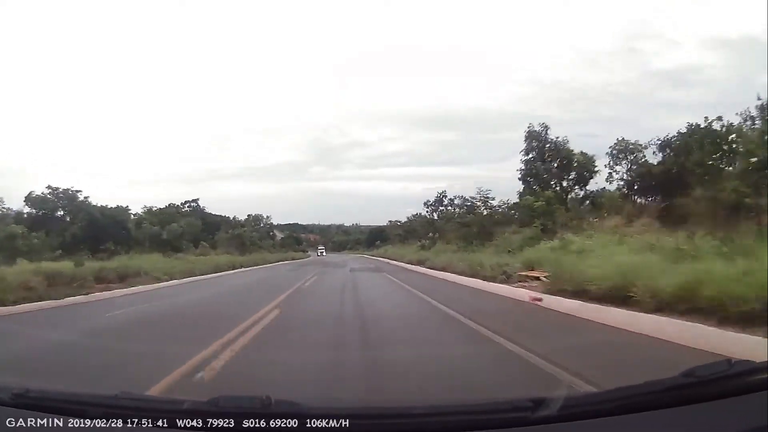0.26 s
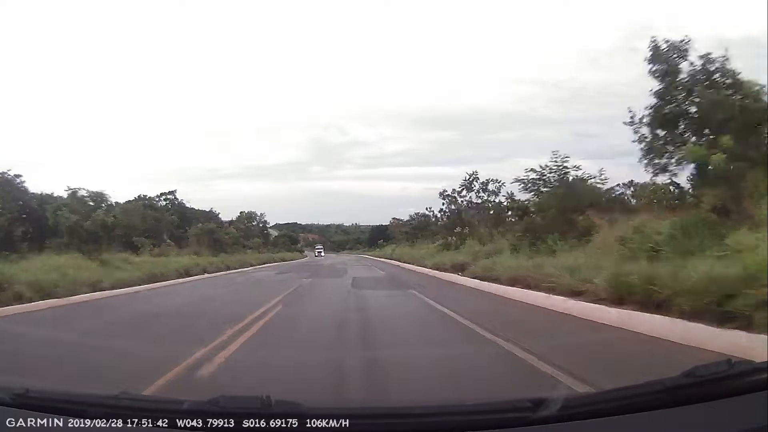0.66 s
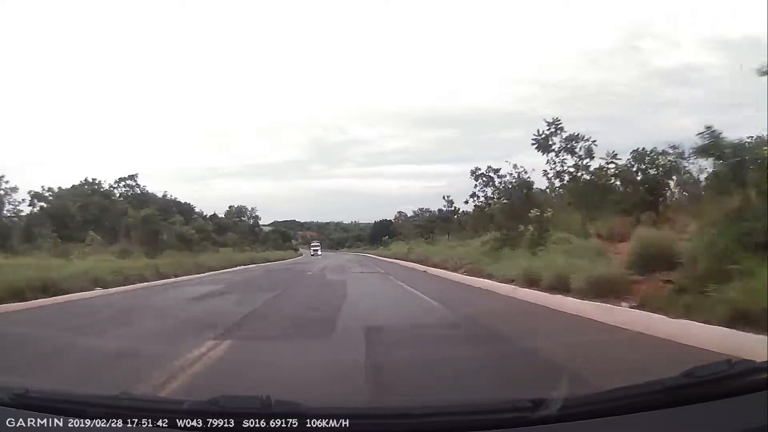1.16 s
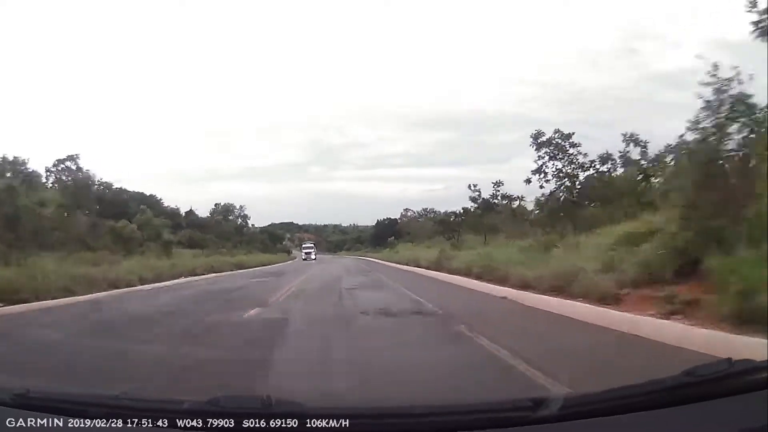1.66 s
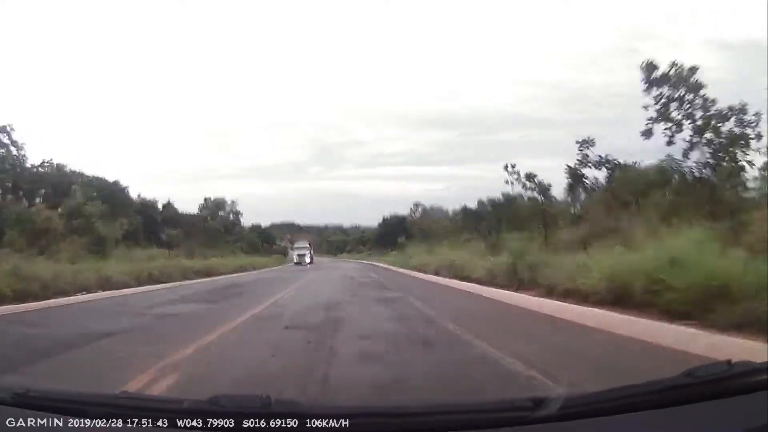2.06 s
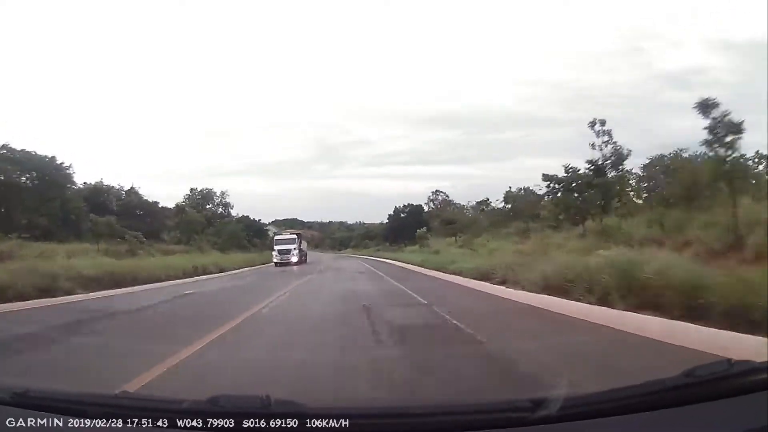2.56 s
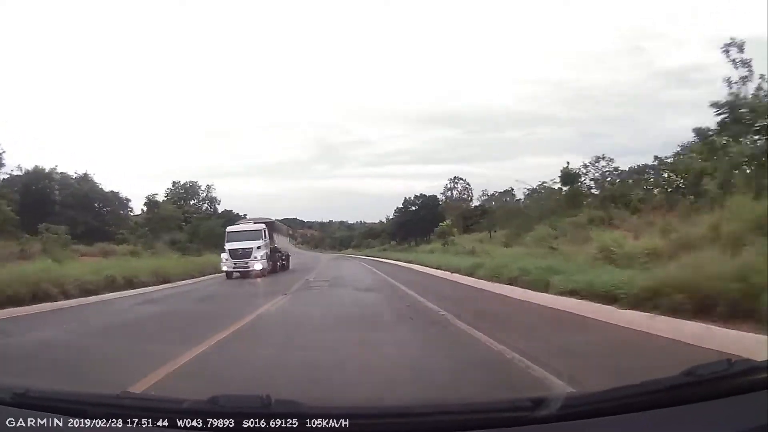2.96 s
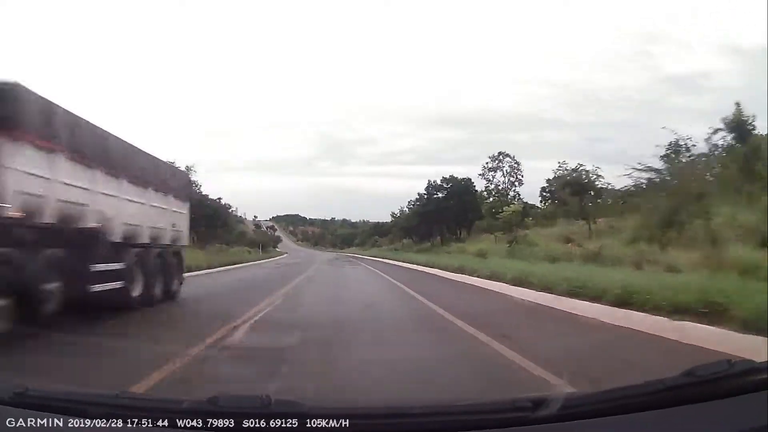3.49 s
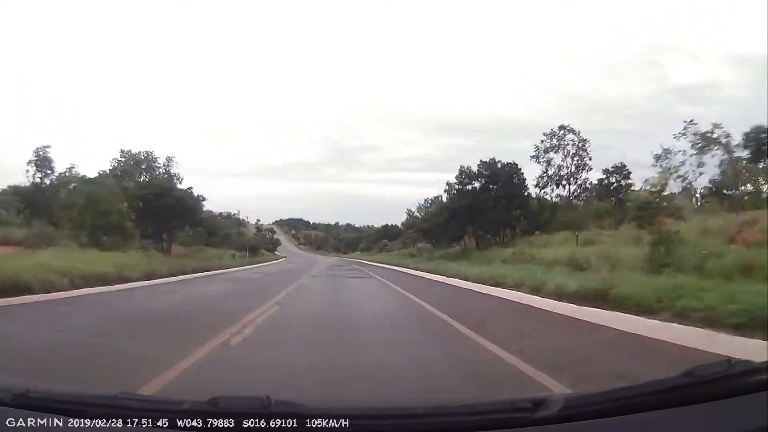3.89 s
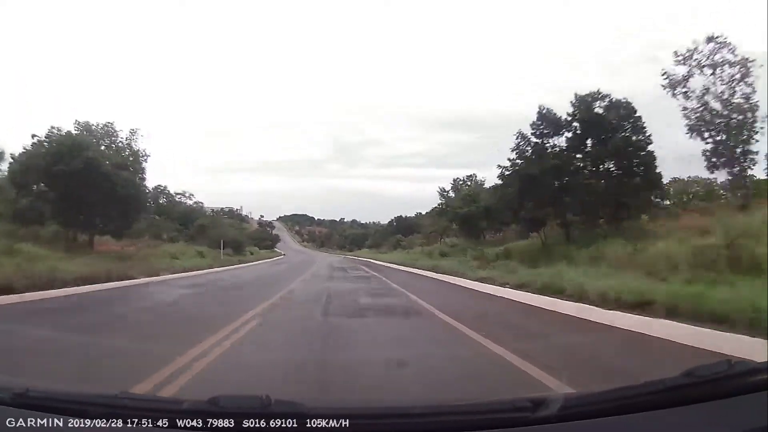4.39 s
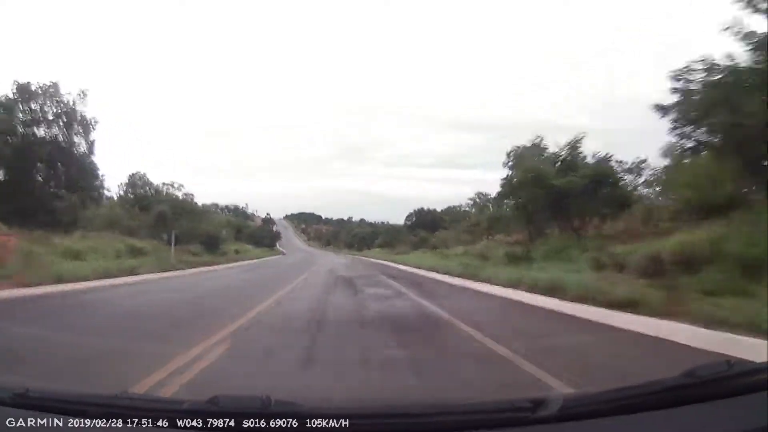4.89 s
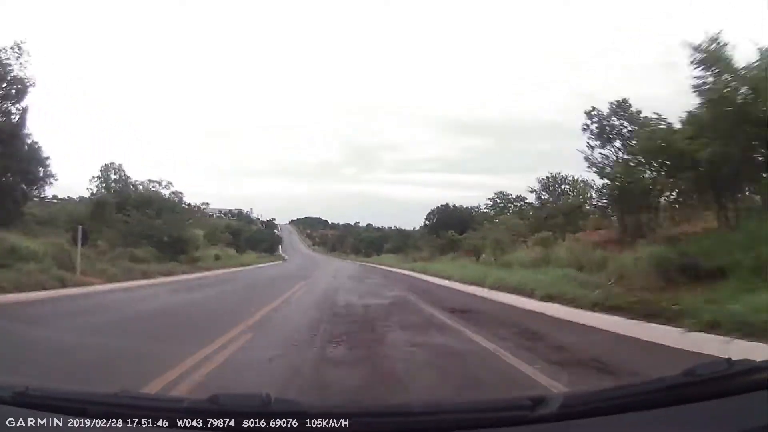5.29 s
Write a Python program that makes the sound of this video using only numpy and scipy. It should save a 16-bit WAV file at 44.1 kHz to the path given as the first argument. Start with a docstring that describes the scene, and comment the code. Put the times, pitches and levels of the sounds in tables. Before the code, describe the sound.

Heavy low rumble of tyres and engine in a car cabin, with bumps, chattering trim, steady faint wind and one brief passing-lorry rush.

```python
"""Inside a car at highway speed, with a small microphone on the windscreen.
Tyre roar and boom, shaped noise that follows a table of the road, lie over engine tones and steady wind.
Patched asphalt shakes the body, sets a loose plastic fitting chattering and overloads the microphone.
An oncoming lorry sweeps past as a swell of noise; trim creaks, and twice a small loose object slides
with a thin, ringing hiss. Plastic, trim and object are damped modes rung by random contacts or rubbing."""
import sys
import numpy as np
from scipy import signal
from scipy.fft import rfft, irfft, next_fast_len
from scipy.io import wavfile
from scipy.ndimage import uniform_filter1d

SR = 44100
rng = np.random.default_rng(int(sys.argv[2]) if len(sys.argv) > 2 else 0)


def transcribe(u):
    """Save the signal u as a 16-bit wav file named by the first command-line argument.

    u: samples, shape (n,) or (channels, n), limited to [-1, 1]; the rate is SR.
    q: integer samples, one column per channel.
    """
    v = np.clip(np.atleast_2d(u).T, -1, 1)
    q = np.round(v * 32767).astype(np.int16)
    wavfile.write(sys.argv[1], SR, q)


N = 244314
TIME = np.arange(N) / SR  # seconds


def amp(db):
    """Decibels to gain."""
    return 10 ** (np.asarray(db) / 20)


def unit(x):
    """Scales to an rms of one."""
    return x / np.sqrt(np.mean(x ** 2) + 1e-20)


def curve(table, column):
    """One column of a table of times, interpolated for every sample."""
    rows = np.asarray(table)
    return np.interp(TIME, rows[:, 0], rows[:, column])


def noise(spectrum, resonances=()):
    """Noise of rms one with the given spectrum, lifted at each resonance."""
    hz, db = np.transpose(spectrum)
    size = next_fast_len(N)
    bins = np.fft.rfftfreq(size, 1 / SR)
    spectrum_db = np.interp(np.log(bins + 1), np.log(hz + 1), db)
    beyond_db = -40 * np.log10(np.maximum(bins / hz[-1], 1))  # 12 dB an octave above the last row
    lift_db = sum(lift / (1 + (2 * (bins - centre) / width) ** 2) for centre, width, lift in resonances)
    shape = amp(spectrum_db + beyond_db + lift_db)
    white = rng.standard_normal(size)
    return unit(irfft(rfft(white) * shape, size)[:N])


def wander(rate_hz):
    """Slow random drift of rms one, with little above the given rate."""
    bins = np.fft.rfftfreq(N, 1 / SR)
    slow = np.exp(-(bins / rate_hz) ** 2) * (bins > 0)
    return unit(irfft(rfft(rng.standard_normal(N)) * slow, N))


def sustained(x, span_s):
    """Evens out the slow swells of a noise, so that its strength is set by what drives it."""
    power = uniform_filter1d(x ** 2, max(int(span_s * SR), 2))
    return x / np.sqrt(power + 1e-6)


def jolt(s, decay_s):
    """A quick rise at time s that dies away."""
    age = np.clip((TIME - s) / decay_s, 0, 20)
    return np.minimum(8 * age, 1) * np.exp(-np.maximum(age - 1 / 8, 0))


def swells(rows):
    """One smooth hump of strength for each row of time, level and length."""
    return sum(amp(db) * np.exp(-(2 * (TIME - s) / length_s) ** 2) for s, db, length_s in rows)


def ring(force, modes):
    """A force rings damped modes of alternating sign; each level weights that mode's energy."""
    t = np.arange(4096) / SR
    response = 0
    for k, (hz, width, db) in enumerate(modes):
        decay = np.exp(-np.pi * width * t)
        strength = (-1) ** k * amp(db) * np.sqrt(width)
        response = response + strength * decay * np.sin(2 * np.pi * hz * t)
    return signal.oaconvolve(force, response / np.linalg.norm(response))[:N]


# The surface passing under the wheels. Each row: time in seconds, unevenness in dB, coarseness in dB.
ROAD_SURFACE = [(0.0, -13, -32.5), (0.14, -7.0, -35.5), (0.32, -18, -32), (1.18, -21, -35),
                (1.35, -11.5, -32.5), (1.62, -6.5, -30), (1.77, -10, -33.5), (2.2, -5, -25.5),
                (2.52, -8.5, -27.5), (2.76, -7.5, -29.5), (3.08, -12, -29.0), (3.3, -12, -34.5),
                (3.53, -10.5, -31.5), (3.76, -8, -25), (3.99, -4, -31), (4.08, -19.5, -34.5),
                (4.6, -19.5, -32.5), (4.82, -8, -29), (5.3, -5, -24.5), (5.54, -12, -30.5)]
BOOM_FROM_COARSE = 0.7  # share of the boom gain (in dB) that follows coarseness; the rest, unevenness


def shaking():
    """How hard the road shakes the body and the cabin air: (shudder gain, boom gain)."""
    uneven, coarse = curve(ROAD_SURFACE, column=1), curve(ROAD_SURFACE, column=2)
    return amp(uneven), amp(uneven + BOOM_FROM_COARSE * (coarse - uneven))


# Colours of body shudder, cabin boom, tyre roar and the thud of a tyre hitting a joint.
# Each row: frequency in Hz, relative density in dB per Hz.
SHUDDER_COLOUR = [(5, -16), (11, -1.5), (17, -3.5), (32, 3), (42, -10), (52, -3.5), (63, -4), (75, -5),
                  (90, -20), (140, -51)]
BOOM_COLOUR = [(45, -20.5), (68, -7), (80, -1), (96, -1.5), (108, -4.5), (124, -0.5), (137, -6), (155, -8),
               (180, -13), (205, -14.5), (222, -20.5), (275, -22.5), (330, -31.5), (500, -39)]
TREAD_COLOUR = [(170, -62), (250, -3.5), (300, 0), (330, -4), (385, -2.5), (420, -8.5), (480, -13.5),
                (560, -13), (730, -19), (1000, -22.5), (1430, -30.5), (1650, -28.5), (3000, -45.5),
                (7000, -41.5)]
THUD_COLOUR = [(80, -24), (190, 8.5), (280, 8), (380, 4.5), (480, -10), (680, -11.5), (1000, -16),
               (1600, -33), (3000, -35)]
# Resonances of suspension, body, cabin air and tyre cavity. Each row: frequency in Hz, width in Hz, lift in dB.
CABIN_RESONANCES = [(15.2, 4.5, 1.5), (23.8, 6.9, 6.5), (196, 9.9, 1.5), (355, 26, 5.5), (604, 100, 3.5),
                    (799, 27, 6.5), (910, 48, 6), (1028, 40, 4), (1246, 28, 7), (3790, 280, 6.5)]
# Joints in the asphalt. Each row: time in seconds, thud in dB, boom in dB, decay in seconds.
ROAD_JOINTS = [(0.015, -30.5, -23, 0.067), (1.531, -36, -16, 0.049), (2.079, -23.5, -14, 0.044),
               (2.334, -25, -14, 0.043), (3.115, -41, -10.5, 0.082), (3.602, -24, -13.5, 0.038),
               (5.268, -24, -12, 0.05)]


def road(shudder_db=-2.5, boom_db=4.0, tread_db=-4.0, lumps_db=1.1, grit_db=0.9):
    """The surface shakes the body, booms in the cabin and roars in the tyres; joints add short thumps."""
    sway, drumming = shaking()
    kicks = sum(amp(db) * jolt(s, decay_s) for s, _, db, decay_s in ROAD_JOINTS)
    shudder = sustained(noise(SHUDDER_COLOUR, CABIN_RESONANCES), 0.1305) * sway * amp(shudder_db)

    boom_gain = np.hypot(drumming * amp(boom_db + lumps_db * wander(6.6)), kicks)
    boom = sustained(noise(BOOM_COLOUR, CABIN_RESONANCES), 0.0777) * boom_gain

    tread_gain = amp(curve(ROAD_SURFACE, column=2) + tread_db + grit_db * wander(25))
    tread = noise(TREAD_COLOUR, CABIN_RESONANCES) * tread_gain

    thud_gain = sum(amp(db) * jolt(s, decay_s) for s, db, _, decay_s in ROAD_JOINTS)
    thumps = noise(THUD_COLOUR, CABIN_RESONANCES) * thud_gain
    return shudder + boom + tread + thumps


# Body panels, the first driven by the shudder, the second by the boom.
# Each row: frequency in Hz, level over that drive in dB, drive that wakes it in dB.
DRONING_PANELS = [(61.94, -11.5, -14), (116.2, 3, -25)]


def drones(waver=0.0066, throb_db=0.5):
    """Lightly damped panels hold a nearly steady note once the road shakes them hard."""
    notes = 0
    for (hz, db, wake_db), drive in zip(DRONING_PANELS, shaking()):
        awake = drive ** 2 / (drive ** 2 + amp(wake_db) ** 2)
        turns = np.cumsum(hz * (1 + waver * wander(5.5))) / SR + rng.random()
        tone = np.sqrt(2) * np.sin(2 * np.pi * turns)
        notes = notes + drive * awake * amp(db + throb_db * wander(5.3)) * tone
    return notes


# The engine's tones. Each row: multiple of the crankshaft speed, rms level in dB.
ENGINE_TONES = [(1, -30.5), (2, -21.5), (4, -44.5), (6, -52)]
CRANK_HZ = 50.13  # crankshaft turns a second


def engine(waver=0.0038, throb_db=1.5):
    """A four-cylinder engine at nearly steady speed: two firings a turn give the drone."""
    turns = np.cumsum(CRANK_HZ * (1 + waver * wander(3.33))) / SR
    total = 0
    for order, db in ENGINE_TONES:
        tone = np.sqrt(2) * np.sin(2 * np.pi * (order * turns + rng.random()))
        total = total + amp(db + throb_db * wander(3.3)) * tone
    return total


# Bouts of free rattling. Each row: start in seconds, length in seconds, level of a contact in dB.
RATTLE_BOUTS = [(2.122, 0.44, -46), (3.669, .17, -47.5), (5.061, 0.42, -44.5)]
# Knocks that stand out from the chatter. Each row: time in seconds, relative peak in dB.
FITTING_KNOCKS = [(0.1156, -35), (1.651, -33), (2.168, -30), (2.2936, -29), (2.4415, -40), (2.5216, -33),
                  (2.7012, -37), (2.992, -31), (3.166, -32.5), (3.7146, -32), (3.8102, -31), (5.0784, -33),
                  (5.1743, -38), (5.3664, -28)]
# Modes of the plastic. Each row: frequency in Hz, width in Hz, relative level in dB.
PLASTIC_MODES = [(6920, 480, -14.5), (8670, 450, -9), (9740, 370, -6.5), (10620, 260, -3.5),
                 (11150, 320, -2), (11500, 510, 2.5), (11630, 300, -2.5), (11700, 320, -10.5),
                 (13900, 2500, -8)]
BUZZ_FROM_DB, BUZZ_RANGE_DB = -28.5, 2  # coarseness that starts the buzz, and the softness of its onset
RATTLE_EDGE_S = 0.034  # fade at each end of a bout


def fitting(knock_db=-9, buzz_db=-53, rattles_hz=160, spread_db=2.2, rattle_s=0.0016, dry_db=-13,
            clump_db=1.5, clump_hz=100, bounce_s=0.0029, contacts_hz=5000):
    """Coarse asphalt makes loose plastic buzz; in bouts it rattles, and knocks are quick runs of bounces."""
    loose = 1 / (1 + np.exp((BUZZ_FROM_DB - curve(ROAD_SURFACE, column=2)) / BUZZ_RANGE_DB))
    clumps = unit(amp(clump_db * np.clip(wander(clump_hz), -2, 2)))
    buzz = amp(buzz_db) * loose * clumps

    bouts = 0
    for start, length, db in RATTLE_BOUTS:
        inside_s = np.minimum(TIME - start, start + length - TIME)
        bouts = bouts + amp(db) * np.clip(inside_s / RATTLE_EDGE_S + 0.5, 0, 1)
    happens = rng.random(N) < rattles_hz / SR
    hits = happens * bouts * amp(spread_db * np.clip(rng.standard_normal(N), -2, 2))
    rattles = signal.oaconvolve(hits, jolt(0, rattle_s)[:4096])[:N]

    knocks = sum(amp(db + knock_db) * jolt(s, bounce_s) for s, db in FITTING_KNOCKS)
    strength = np.sqrt(buzz ** 2 + rattles ** 2 + knocks ** 2)
    # some contacts ring the plastic, others only tick
    ringing, dead = rng.standard_normal((2, N)) * (rng.random((2, N)) < contacts_hz / SR)
    ticks = unit(np.diff(dead, prepend=0))
    return ring(strength * unit(ringing), PLASTIC_MODES) + amp(dry_db) * strength * ticks


# Air pushed aside by the lorry. Each row: frequency in Hz, relative density in dB per Hz.
WAKE_COLOUR = [(150, -13), (420, 5), (700, -16), (1200, -13), (2000, -21), (3600, -25.5), (6000, -34),
               (12000, -27)]


def lorry(pass_s=3.74, span_s=0.2, level_db=-39, buffet_db=1.5):
    """An oncoming lorry sweeps by; its wake rushes briefly along the doors."""
    swell = np.exp(-0.5 * ((TIME - pass_s) / span_s) ** 2)
    return noise(WAKE_COLOUR) * swell * amp(level_db + buffet_db * wander(25))


# Brief bright swishes. Each row: time in seconds, level in dB, length in seconds.
SWISHES = [(1.19, -44.5, 0.084), (3.03, -43.5, 0.077), (3.11, -36, 0.027), (3.36, -42.5, 0.083),
           (4.93, -40, .05), (5.18, -40, 0.08), (5.29, -34.5, 0.036)]
# Their colour. Each row: frequency in Hz, relative density in dB per Hz.
SWISH_COLOUR = [(350, -12), (600, 2), (950, 6), (1300, -7), (2200, -19), (4000, -30)]


def swishes():
    """Bright hissing swishes rise for a moment and fade."""
    return noise(SWISH_COLOUR, CABIN_RESONANCES) * swells(SWISHES)


# Slides of the small object. Each row: start in seconds, length in seconds, rubbing level in dB.
OBJECT_SLIDES = [(2.8, .14, -48), (4.545, 0.15, -53)]
# Modes of the object. Each row: frequency in Hz, width in Hz, relative level in dB.
OBJECT_MODES = [(5520, 340, -4.5), (6280, 350, -2.5), (7040, 200, -4), (7340, 50, -3), (7440, 34, -1),
                (7840, 300, -3), (8800, 200, -2.5)]
SLIDE_RISE_S, SLIDE_STOP_S = 0.093, 0.028  # time to gather speed, and decay on stopping


def slide(slip_db=2.5, slip_hz=50, dry_db=-13, creep_db=-11, creep_s=0.2):
    """The object gathers speed, stops and creeps on a little; uneven slips rub it into its high modes."""
    speed = 0
    for start, length, db in OBJECT_SLIDES:
        after = np.maximum(TIME - start - length, 0)
        creep = amp(creep_db) * np.exp(-after / creep_s)
        stopping = np.maximum(np.exp(-after / SLIDE_STOP_S), creep)
        speed = speed + amp(db) * np.clip((TIME - start) / SLIDE_RISE_S, 0, 1) * stopping
    force = rng.standard_normal(N) * speed * amp(slip_db * wander(slip_hz))
    return ring(force, OBJECT_MODES) + amp(dry_db) * force


# Creaks of the dashboard trim as the body twists. Each row: time in seconds, level in dB, length in seconds.
TRIM_CREAKS = [(1.658, -46.5, .035), (2.16, -50, .03), (3.718, -47.5, .015), (4.83, -55, .02),
               (5.08, -48, .02), (5.37, -50, .025)]
# Modes of the trim. Each row: frequency in Hz, width in Hz, relative level in dB.
TRIM_MODES = [(2850, 350, 3), (3700, 500, -5.5), (4650, 700, -1), (6600, 900, -3), (12500, 3000, 2)]


def creaks(slips_hz=2500):
    """A short run of dense slips rings the trim."""
    slips = unit(rng.standard_normal(N) * (rng.random(N) < slips_hz / SR))
    return ring(swells(TRIM_CREAKS) * slips, TRIM_MODES)


# Air over the windscreen. Each row: frequency in Hz, relative density in dB per Hz.
WIND_COLOUR = [(100, -6), (500, -5), (1000, 8), (1400, -1.5), (1700, 0), (2300, -3), (3200, -8),
               (4800, -14.5), (8000, -18), (11000, -14.5), (16000, -19.5)]


def wind(level_db=-47.5, flutter_db=1.0):
    """Air rushes over the windscreen, fluttering slightly about a steady level."""
    return noise(WIND_COLOUR) * amp(level_db + flutter_db * wander(13))


def scene():
    """Everything meets at the one microphone."""
    car = road() + drones() + engine() + wind()
    loose_parts = fitting() + slide() + creaks()
    return (car + loose_parts + lorry() + swishes())[None]


def record(dry, ceiling=0.66, knee=12, leak=0.02, droop_hz=1.6, hiss_db=-58, edge_hz=15850):
    """The input flattens the biggest swings, a coupling filter droops the flat tops; then hiss, band limit."""
    clipped = dry / (1 + np.abs(dry / ceiling) ** knee) ** (1 / knee)
    clipped = clipped + leak * (dry - clipped)  # the ceiling gives a little
    coupled = signal.lfilter(*signal.butter(1, droop_hz, "high", fs=SR), clipped)
    coupled = coupled + amp(hiss_db) * rng.standard_normal(N)
    lowpass = signal.firwin(1201, edge_hz, window=("kaiser", 9), fs=SR)
    return signal.oaconvolve(coupled, lowpass[None], "same")


dry = scene()
out = record(dry)
transcribe(out)
```